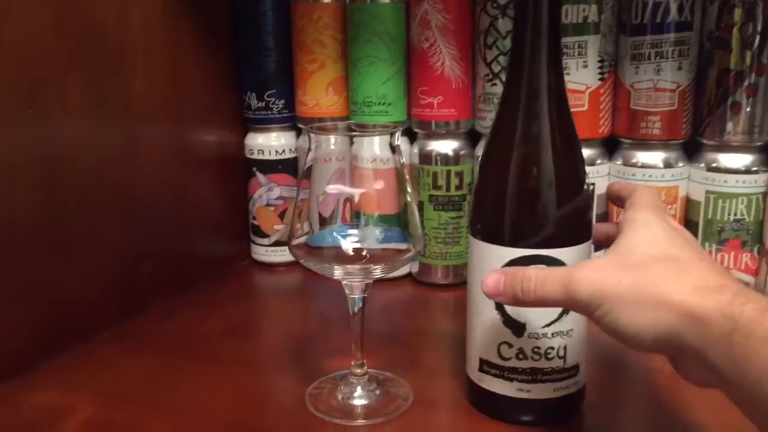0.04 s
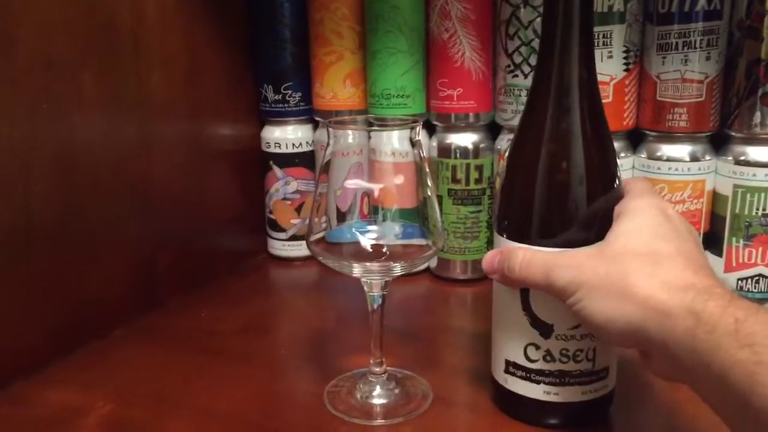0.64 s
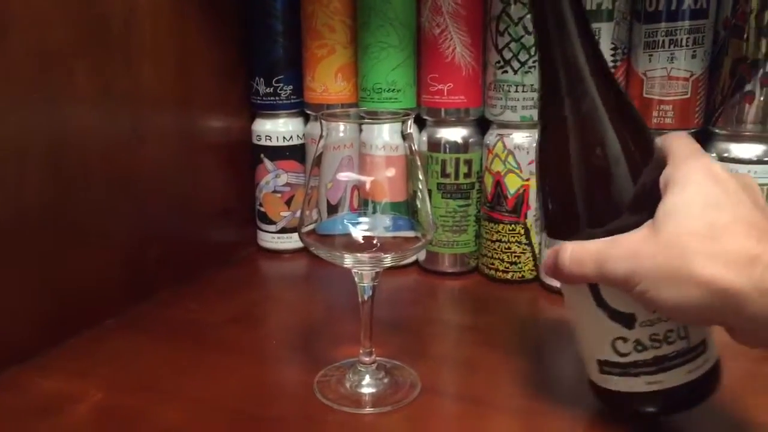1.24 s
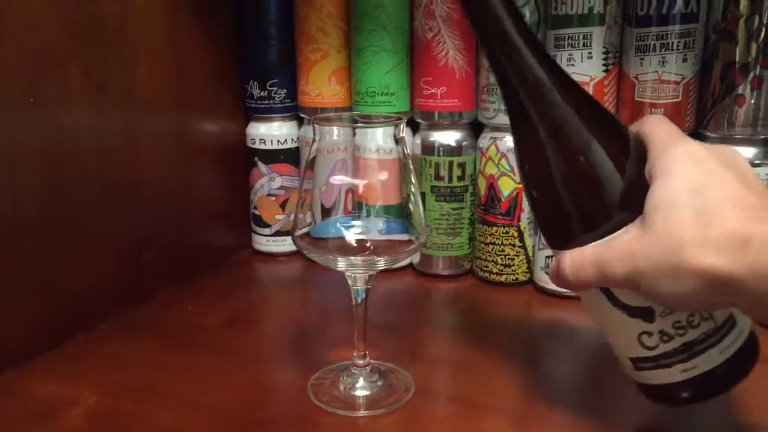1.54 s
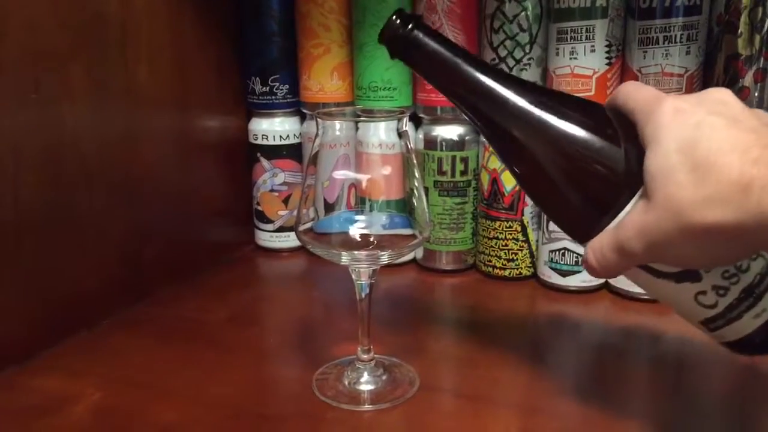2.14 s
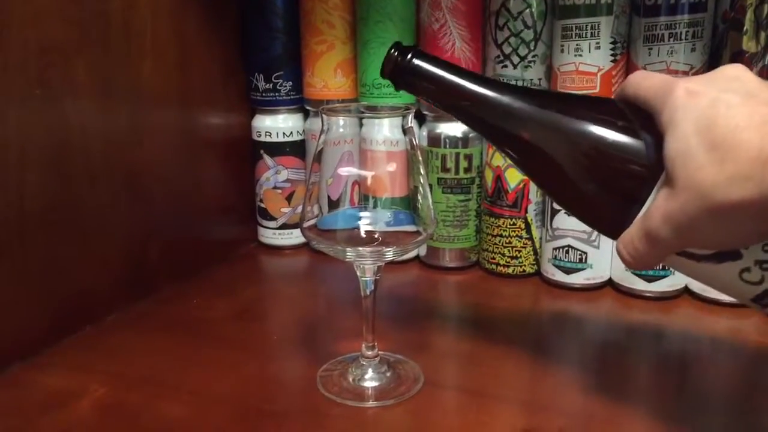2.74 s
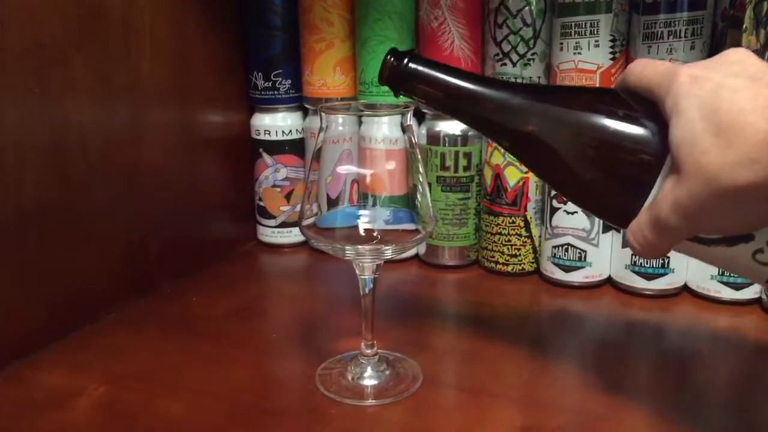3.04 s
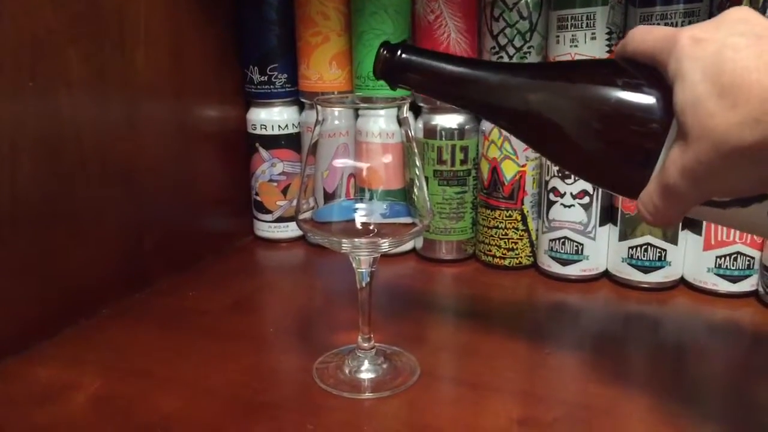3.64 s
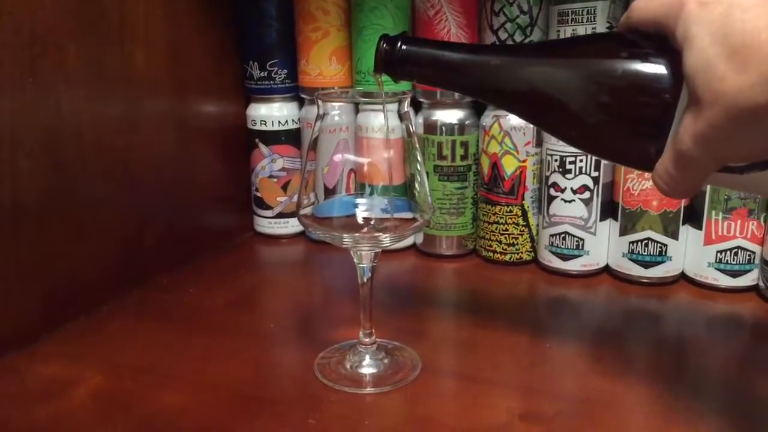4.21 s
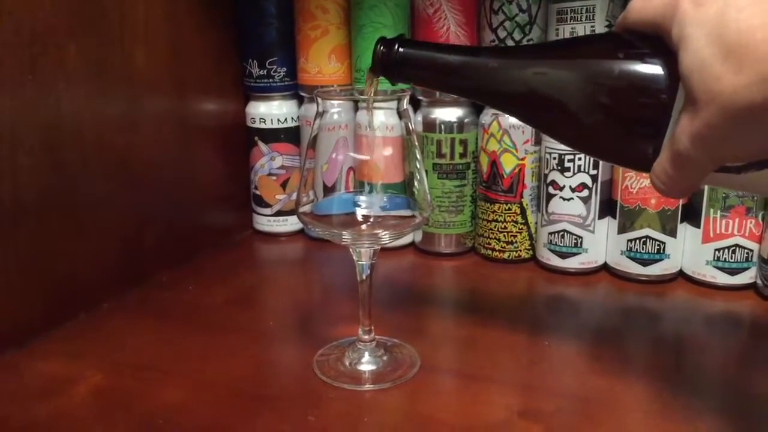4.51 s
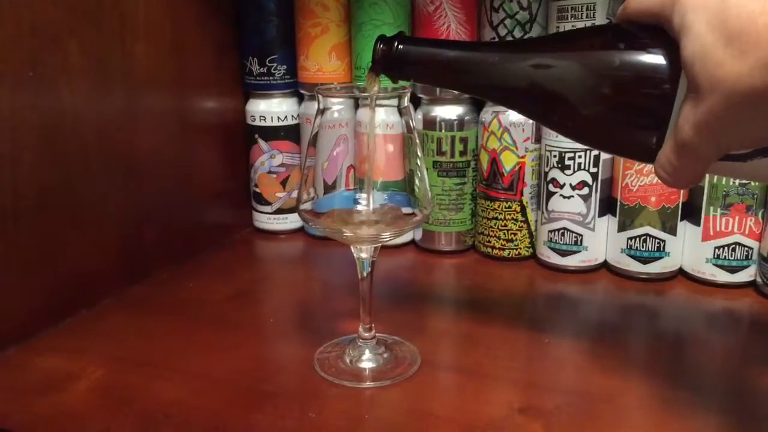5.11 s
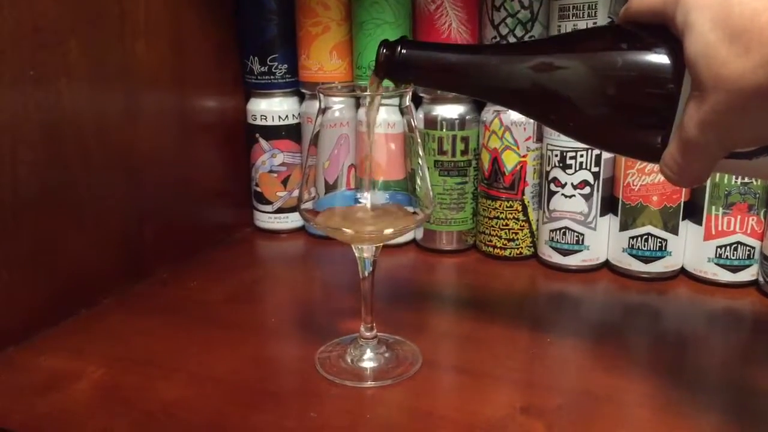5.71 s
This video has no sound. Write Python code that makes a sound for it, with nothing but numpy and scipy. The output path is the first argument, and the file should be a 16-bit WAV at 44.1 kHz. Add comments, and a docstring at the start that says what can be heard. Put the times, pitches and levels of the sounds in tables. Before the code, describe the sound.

In a quiet room, a beer bottle scrapes briefly over a wooden shelf as it is lifted. Its neck then strikes the rim of a stemmed glass with a bright clink that rings on and wavers. After some soft hand rustles, the first beer drips and bubbles faintly into the glass, and the neck touches the rim again more softly. The close, hand-held microphone picks up low bumps and a faint appliance hum.

```python
"""In a quiet room, close to a hand-held phone, a beer bottle slides off a wooden shelf by stick-slip
friction and is tipped over a stemmed glass. Its neck strikes the rim and excites normal modes: the bowl
rings and beats, the bottle pings, the stem knocks the shelf. The first beer drips and fizzes into the
bowl, each bubble a small resonator, and the neck touches the rim again, more softly.
Handling noise, room air and the hum of an appliance lie underneath."""
import sys
import numpy as np
from scipy import signal
from scipy.fft import rfft, irfft
from scipy.io import wavfile

SR = 44100
rng = np.random.default_rng(int(sys.argv[2]) if len(sys.argv) > 2 else 0)


def digitize_waveform(pressure):
    """Quantize a signal to 16-bit integers and store it at the path in sys.argv[1].

    Rows of a 2-D input are taken as channels; values are limited to [-1, 1].
    """
    field = np.atleast_2d(pressure).T
    bounded = np.clip(field, -1, 1)
    quanta = np.round(bounded * 32767).astype(np.int16)
    wavfile.write(sys.argv[1], SR, quanta)


N = 254016
T = np.arange(N) / SR
HZ = np.maximum(np.fft.rfftfreq(N, 1 / SR), 1)


# Neck on rim: t/s, gain/dB of glass, partners (re glass), bottle, shelf and crack, cut-off f/Hz
RIM_TOUCHES = [(2.976, 0.5, 0.5, 3, 0.5, 3.5, 16130), (5.6858, -6.5, -49, -35, -10.5, -16.5, 2700)]

def clinks(swell_s=0.0032, stem_lag_s=0.0018):
    """Impact excitation: a touch drives bowl, bottle and shelf; a softer contact passes less treble."""
    out = np.zeros(N)
    for s, glass_db, partner_db, bottle_db, shelf_db, crack_db, cutoff_hz in RIM_TOUCHES:
        hit = undb(glass_db) * bowl(partner_db) + undb(bottle_db) * bottle()
        add(hit, stem_lag_s, undb(shelf_db) * shelf())
        hit *= rise(swell_s)  # the modes build up while neck and rim press together
        hit += undb(crack_db) * crack()
        pole = np.exp(-2 * np.pi * cutoff_hz / SR)
        add(out, s, signal.lfilter([1 - pole], [1, -pole], hit))
    return out


# Bowl modes: f/Hz, relative level/dB, T60/s
BOWL_MODES = [(1091.6, -36.6, 4.95), (2976.9, -27.5, .76), (4622, -41, .22), (8037, -45, .15),
              (9927, -42, .07), (12330, -50, .1), (13200, -55, .11)]
# Close partners of the low modes: f/Hz, relative level/dB, T60/s, polarity at the microphone
PARTNER_MODES = [(1103.4, -45.6, 5.4, -1), (2978.5, -29.6, .76, 1), (2956.5, -28, .3, -1)]

def bowl(partner_db):
    """Mode splitting: the bowl is not quite round, so its low modes beat with close partners."""
    out = np.zeros(N)
    for hz, db, t60 in BOWL_MODES:
        add(out, 0, undb(db) * ring(hz, t60))
    for hz, db, t60, polarity in PARTNER_MODES:  # their share depends on where the rim is touched
        add(out, 0, polarity * undb(partner_db + db) * ring(hz, t60))
    return out


# Bottle modes: f/Hz, relative level/dB, T60/s, fractional rise in pitch
BOTTLE_MODES = [(1957, -26, .24, 0.058), (2212, -40, 0.27, 0.016), (3693, -31, 0.055, 0),
                (4800, -29, 0.11, 0.018), (5170, -43, 0.095, 0.055), (5540, -47, .18, 0.0081),
                (7800, -56.5, 0.14, 0.02), (8140, -34, 0.1, 0.0081), (8800, -52, 0.087, 0.0085),
                (9200, -55, 0.2, 0)]

def bottle():
    """Damped free vibration: the hand shortens the ping, and shifting beer bends its modes upward."""
    out = np.zeros(N)
    for hz, db, t60, bend in BOTTLE_MODES:
        add(out, 0, undb(db) * ring(hz, t60, bend))
    return out


# Modes of the shelf and the air in its alcove: f/Hz, relative level/dB, T60/s
SHELF_MODES = [(63, -41, .4), (88, -42, .25), (126, -42, .28), (154, -41, .22), (188, -36, .22),
               (274, -28, .12), (296, -20.5, .155), (334, -29, .15), (383, -25.5, .16), (513, -25.5, .11),
               (563, -25, .1), (604, -19.5, .11), (710, -29, .13), (738, -31, .13), (826, -27, .13),
               (1357, -40, .14), (1575, -41, .16)]

def shelf():
    """Structure-borne sound: the blow travels down the stem and excites short-lived modes."""
    out = np.zeros(N)
    for k, (hz, db, t60) in enumerate(SHELF_MODES):
        add(out, 0, (-1) ** k * undb(db) * ring(hz, t60))
    return out


# Contact noise: f/Hz, relative spectrum level/dB
CRACK_SPECTRUM = [(100, -16), (300, 7), (450, 4), (700, 4), (1100, -6.5), (1900, -7.5), (2600, -14.5),
                  (3700, -18), (5200, -21), (6600, -28.5), (8200, -20.5), (10800, -33.5), (12400, -27),
                  (16000, -37.5)]

def crack(press_s=0.00081, direct_db=-18.5, direct_t60=0.075, alcove_db=-47.5, alcove_t60=0.49):
    """Scattering: the alcove draws the broadband noise of contact out into a faint tail."""
    out = np.zeros(N)
    for db, t60 in (direct_db, direct_t60), (alcove_db, alcove_t60):
        contact = colour(noise(), CRACK_SPECTRUM) * rise(press_s)
        add(out, 0, undb(db) * burst(contact, t60))
    return out


# Pushes of the bottle over the wood: t/s, duration/s, starting level/dB of boom and of grit
SLIDE_PUSHES = [(0.622, 0.052, -53.5, -59), (0.707, 0.16, -46.5, -54), (0.841, 0.026, -40.5, -50.5)]
# Low and high resonances of the slide: f/Hz, width/Hz, relative level/dB
BOOM_PEAKS = [(72, 28, -8.5), (120, 25, -2), (288, 15.3, -5), (374, 7.1, -34)]
GRIT_PEAKS = [(630, 36.5, 5.5), (919, 34, -0.5), (1470, 270, -14.5), (1870, 41, -11.5), (2470, 135, -11.5),
              (3020, 290, -17.5)]

def slide(attack_s=0.0073, growth_db_per_s=35, scratch_db=-25, judder_hz=45.2, judder_db=2):
    """Stick-slip friction: the knurled base catches on the wood; the boom lingers after lift-off."""
    boom_env, grit_env = np.zeros(N), np.zeros(N)
    for s, length, boom_db, grit_db in SLIDE_PUSHES:  # each push gathers speed until it ends
        add(boom_env, s, undb(boom_db) * stroke(attack_s, length, growth_db_per_s, t60=0.26))
        add(grit_env, s, undb(grit_db) * stroke(attack_s, length, growth_db_per_s, t60=0.12))
    slips = clicks(per_s=1200, spread_db=1)
    scratch = resonate(slips, [(5150, 1200, 0), (7500, 2500, -15)])
    grit = resonate(slips, GRIT_PEAKS) + undb(scratch_db) * scratch
    judder = undb(judder_db * wobble(judder_hz))  # the base catches unevenly
    return boom_env * resonate(slips, BOOM_PEAKS) + grit_env * judder * grit


# Drops landing on the bowl: t/s, level/dB
DROP_HITS = [(4.666, -57.5), (4.894, -52), (5.135, -58), (5.198, -61), (5.451, -62.5), (5.608, -51.5),
             (5.73, -66)]
# Tick of liquid on glass: f/Hz, relative spectrum level/dB
TICK_SPECTRUM = [(1500, -22), (3700, -8), (6000, -12), (8200, -7.5), (12500, 1), (16000, -6)]

def drops(attack_s=0.001, ring_db=-17, lowest_hz=6000):
    """Impulse response: each drop ticks on the bowl and excites only its highest modes."""
    out = np.zeros(N)
    for s, db in DROP_HITS:
        tick = colour(noise(), TICK_SPECTRUM) * rise(attack_s)
        add(out, s, undb(db) * burst(tick, t60=0.078))
        for hz, _, t60 in BOWL_MODES:
            if hz > lowest_hz:
                add(out, s, undb(db + ring_db) * ring(hz, t60))
    return out


# Spurts of beer: t/s, duration/s, fizz drive level/dB, splash level/dB
BEER_SPURTS = [(5.149, 0.094, -59.5, -80), (5.631, 0.017, -68.5, -50)]
# Band of the low splash: f/Hz, width/Hz, relative level/dB
SPLASH_BAND = [(730, 980, 0)]

def pour(foam_db=-78.5, spray_db=-12.5):
    """Air entrainment: spurts splash, trap bubbles and throw a fine spray against the bowl."""
    flow, splash_env = np.zeros(N), np.zeros(N)
    for s, length, fizz_db, splash_db in BEER_SPURTS:
        spurt = stroke(attack_s=0.0036, length_s=length, t60=0.15)
        add(flow, s, undb(fizz_db) * spurt)
        add(splash_env, s, undb(splash_db) * spurt)
    foam = fizz(flow + undb(foam_db), start_s=BEER_SPURTS[0][0])
    bubbling = alcove(foam + bubbles())
    spray = undb(spray_db) * flow * colour(noise(), TICK_SPECTRUM)
    splash = splash_env * resonate(resonate(noise(), SPLASH_BAND), SPLASH_BAND)
    return splash + spray + bubbling


# Large single bubbles, the first row a brief ringing splat as a drop lands: t/s, f/Hz, level/dB, T60/s
LARGE_BUBBLES = [(4.902, 3650, -42.5, .015), (5.123, 1930, -59, .07), (5.173, 2484, -43, 0.068),
                 (5.197, 3730, -39, .023), (5.226, 2400, -50, .07), (5.241, 2502, -49, 0.18),
                 (5.3985, 4960, -60.5, .036), (5.43, 2450, -62, .1), (5.576, 1810, -54, .04),
                 (5.638, 1890, -54, .057), (5.639, 2350, -48, 0.08)]

def bubbles(pinch_s=0.0011):
    """Bubble resonance: trapped gas pulsates as it pinches off, and the tone rises in pitch."""
    out = np.zeros(N)
    for s, hz, db, t60 in LARGE_BUBBLES:
        tone = ring(hz, t60, bend=0.027)
        add(out, s, undb(db) * tone * rise(pinch_s)[:len(tone)])
    return out


def fizz(flow, start_s, count=1100, low_hz=2100, high_hz=13000, gain_db=-2, tilt_db=-8, spread_db=3):
    """Resonance varies inversely with size: smaller bubbles chirp higher and fainter; flow sets level."""
    out = np.zeros(N)
    for when, smallness, luck in rng.random((count, 3)):
        s = start_s + when * (T[-1] - start_s)
        hz = low_hz * (high_hz / low_hz) ** smallness
        db = gain_db + tilt_db * smallness + spread_db * min(-np.log(1 - luck), 3)
        chirp = ring(hz, t60=80 / hz, bend=0.18)
        add(out, s, flow[int(s * SR)] * undb(db) * chirp)
    return out


def alcove(x, wet_db=-5, t60=0.081):
    """Reverberation: dense reflections add a brief smear to the direct sound."""
    echo = burst(noise(), t60)
    return x + undb(wet_db) * signal.fftconvolve(x, echo / np.linalg.norm(echo))[:N]


# Rubs of hand and sleeve: t/s, attack/s, duration/s, level/dB
HAND_RUBS = [(0.0, .02, 0.23, -58.5), (1.285, .01, 0.035, -61.5), (1.67, .03, 0.069, -64),
             (3.331, .01, .025, -54), (3.829, .015, 0.098, -61.5), (4.115, 0.055, 0.094, -46),
             (4.456, 0.0077, 0.054, -45), (4.575, .003, 0.045, -43)]
# Hollow resonances of a rub: f/Hz, width/Hz, relative level/dB
RUB_PEAKS = [(119, 60, -2), (215, 25, 7.5), (406, 39, -8), (680, 15, -1), (1004, 160, -10.5),
             (1524, 34, -8), (1865, 77, -18), (2360, 69, -21.5), (2700, 190, -30)]
# Shifts of the phone in the hand: centre t/s, level/dB, f/Hz
PHONE_SHIFTS = [(0.016, -39.5, 42), (0.095, -47, 58.2), (2.198, -57, 45), (2.57, -52, 38), (3.244, -34, 36),
                (3.373, -39, 39), (4.064, -45, 39), (4.63, -42.5, 70), (4.7, -42, 38), (5.181, -42, 40)]

def handling(sag_db_per_s=44, rock_cycles=4.83):
    """Friction and rocking: grainy rubs fade as pressure eases; each shift sways the phone briefly."""
    pressure, rumble = np.zeros(N), np.zeros(N)
    for s, attack, length, db in HAND_RUBS:
        add(pressure, s, undb(db) * stroke(attack, length, -sag_db_per_s, t60=0.27))
    for s, db, hz in PHONE_SHIFTS:
        swell = np.exp(-(np.pi * (T - s) * hz / rock_cycles) ** 2)
        rumble += undb(db) * swell * np.sin(2 * np.pi * (hz * T + rng.random()))
    grains = clicks(per_s=1200, spread_db=2.5)
    return pressure * resonate(grains, RUB_PEAKS) + rumble


# Room air: f/Hz, relative spectrum level/dB
AIR_SPECTRUM = [(15, -32.5), (25, -11), (49, -1.5), (70, -3), (82, -11.5), (120, -11), (179, -26.5),
                (216, -4), (248, -15.5), (500, -24.5), (620, -25), (1060, -26.5), (1390, -30.5),
                (1640, -29), (15800, -46.5)]

def room(air_db=-63, hum_db=-71.5, hum_hz=217.2, hum_width_hz=17):
    """Ambient noise: broadband air, and an appliance whose narrow band is heard as a wavering hum."""
    air = undb(air_db) * colour(noise(), AIR_SPECTRUM)
    hum = undb(hum_db) * resonate(noise(), [(hum_hz, hum_width_hz, 0)])
    return air + hum


def undb(db):
    """Amplitude ratio of a level in decibels."""
    return 10 ** (np.asarray(db) / 20)


def unit(x):
    """Normalisation to rms 1."""
    return x / np.sqrt(np.mean(x ** 2))


def colour(x, points):
    """Spectral shaping through (f/Hz, level/dB) points, at rms 1."""
    hz, db = np.transpose(points)
    response = undb(np.interp(np.log(HZ), np.log(hz), db))
    return unit(irfft(rfft(x) * response, N))


def resonate(x, peaks):
    """Steep parallel resonances (f/Hz, width/Hz, level/dB), at rms 1."""
    response = sum(undb(db) / (1 + .5j * hz / width * (HZ / hz - hz / HZ)) ** 2
                   for hz, width, db in peaks)
    return unit(irfft(rfft(x) * response, N))


def noise():
    """White noise."""
    return rng.standard_normal(N)


def clicks(per_s, spread_db):
    """Shot noise: tiny random impacts of uneven size."""
    impulses = (rng.random(N) < per_s / SR) * np.sign(noise())
    return impulses * undb(spread_db * np.clip(noise(), -2, 2))


def wobble(hz):
    """Random modulation with a spread near 1."""
    steps = np.arange(0, T[-1] + 1 / hz, 1 / hz)
    return np.interp(T, steps, noise()[:len(steps)])


def rise(tau_s):
    """Exponential approach from 0 to 1."""
    return 1 - np.exp(-T / tau_s)


def fade(t60):
    """Exponential decay over 90 dB."""
    t = T[:int(1.5 * t60 * SR) + 2]
    return np.exp(-np.log(1000) * t / t60)


def ring(hz, t60, bend=0, bend_s=0.048):
    """Damped sinusoid whose pitch creeps up toward hz * (1 + bend)."""
    env = fade(t60)
    pitch = hz * (1 + bend * (1 - np.exp(-T[:len(env)] / bend_s)))
    return env * np.sin(2 * np.pi * np.cumsum(pitch) / SR)


def burst(x, t60):
    """The start of x under exponential decay."""
    env = fade(t60)
    return x[:len(env)] * env


def stroke(attack_s, length_s, growth_db_per_s=0, *, t60):
    """Envelope of driven motion followed by free decay."""
    t = T[:max(int(length_s * SR), 2)]
    held = (1 - np.exp(-t / attack_s)) * undb(growth_db_per_s * t)
    return np.r_[held, held[-1] * fade(t60)]


def add(out, s, x):
    """Superposition of x on out from time s."""
    i = max(int(s * SR), 0)
    out[i:i + len(x)] += x[:N - i]


def scene():
    """Superposition of all sources at one microphone."""
    return (clinks() + slide() + handling() + drops() + pour() + room())[None]


def record(dry):
    """Band limiting: the phone cuts the treble above 15.8 kHz."""
    return signal.sosfilt(signal.ellip(10, .2, 70, 15800, fs=SR, output="sos"), dry)


dry = scene()
out = record(dry)
digitize_waveform(out)
```